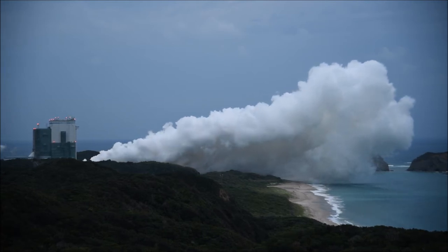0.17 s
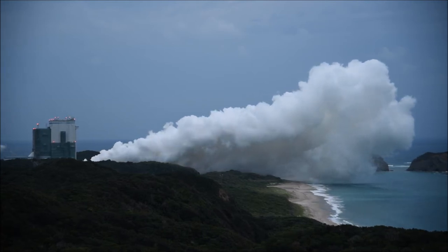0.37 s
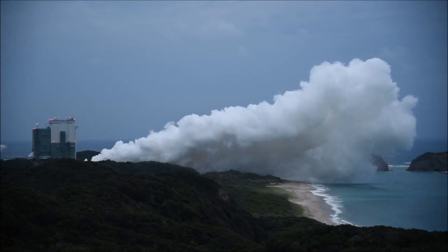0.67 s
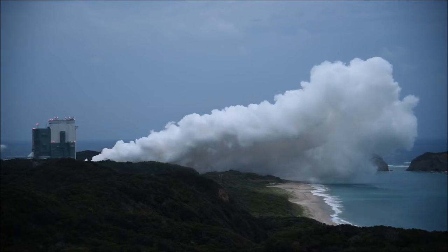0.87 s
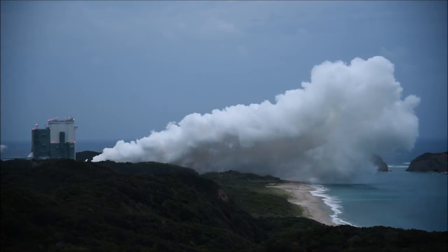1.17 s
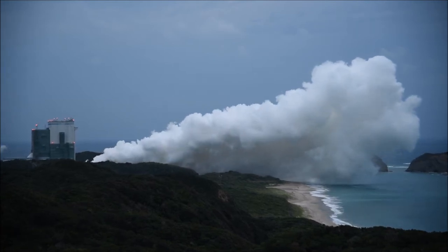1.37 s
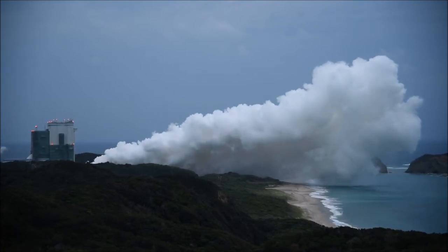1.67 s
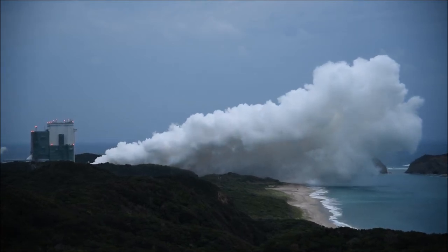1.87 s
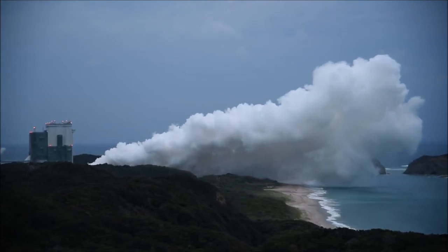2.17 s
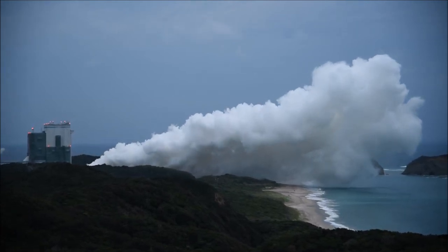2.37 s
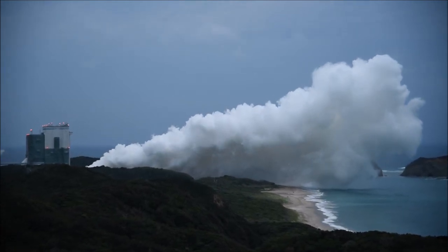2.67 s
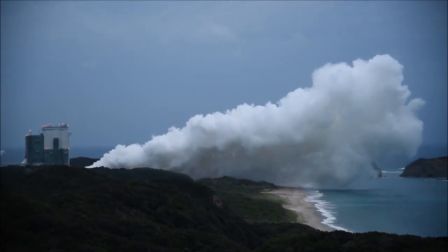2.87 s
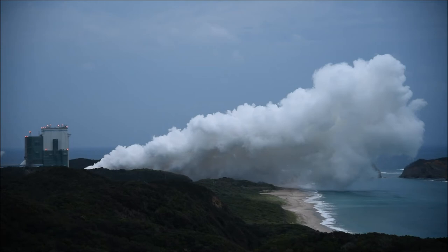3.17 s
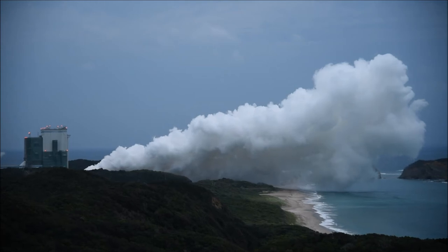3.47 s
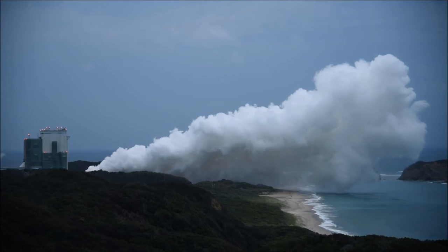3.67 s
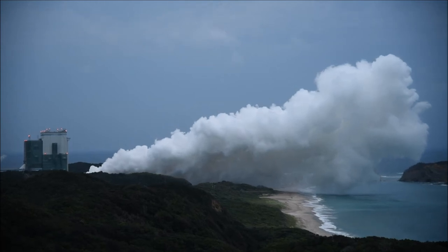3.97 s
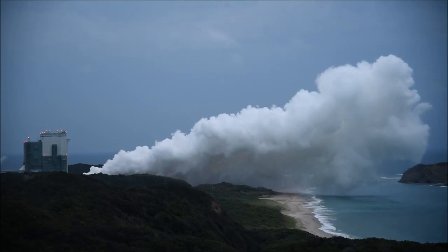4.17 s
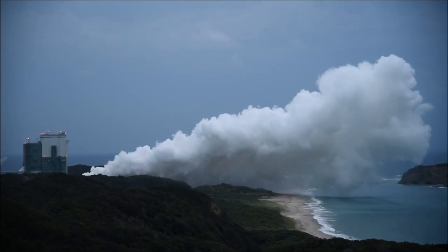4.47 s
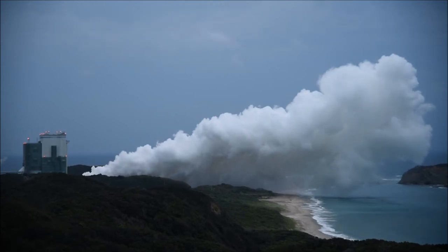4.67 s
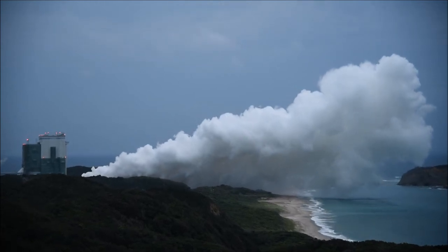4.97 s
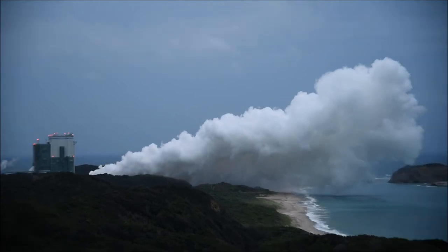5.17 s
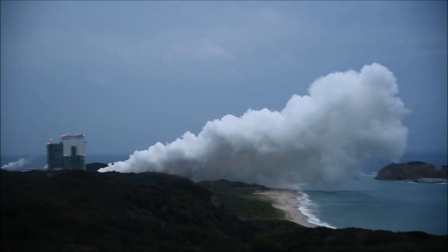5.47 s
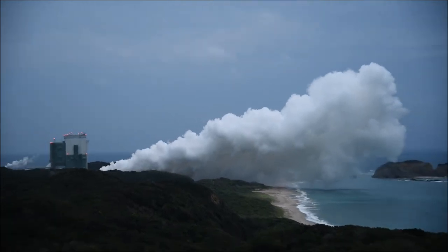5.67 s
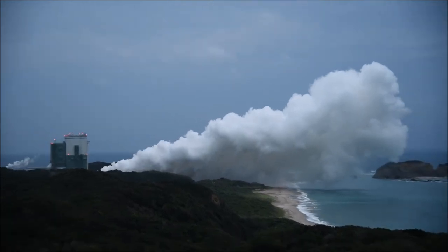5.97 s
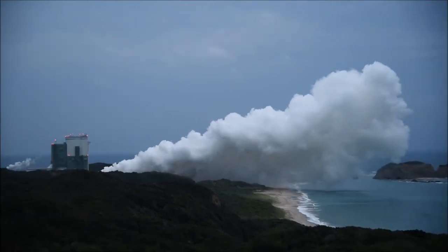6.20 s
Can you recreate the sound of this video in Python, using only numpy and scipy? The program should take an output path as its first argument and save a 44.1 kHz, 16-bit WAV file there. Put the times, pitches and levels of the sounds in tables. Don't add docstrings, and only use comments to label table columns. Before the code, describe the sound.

From 0 s a large rocket engine is already firing on a far stand across a bay, and its roar runs unbroken to the end at about 6.3 s. A deep throb and lumpy rumble lie under a wide, rough rushing roar, with blunted crackles scattered throughout, stronger around 1.3 to 1.8 s. Distance removes most treble; moving air and ground echo make the tone waver, with less deep throb around 3 to 4 s and a fuller, hollower low end after 5 s. Close to the stereo microphone, very faintly, a high insect buzzes on the right and another flutters at a slower rate on the left, both swelling after 4.5 s. Leaves rustle softly, with puffs from 1.4 s, strongest near 5.2 s. Tiny dry twig ticks fall between 1.4 and 5.2 s. A very high, thin camera whine rises briefly near 4.9 s and again from 5.8 s.

```python
import sys
import numpy as np
from scipy import signal
from scipy.fft import rfft, irfft, next_fast_len
from scipy.io import wavfile
from scipy.ndimage import uniform_filter1d, minimum_filter1d, map_coordinates

SR = 44100
rng = np.random.default_rng(int(sys.argv[2]) if len(sys.argv) > 2 else 0)


def invert_db(level):
    return 10 ** (np.asarray(level, dtype=float) / 20)


def log_audio(samples):
    frames = np.atleast_2d(samples).T
    limited = np.clip(frames, -1, 1)
    pcm = np.round(limited * 32767).astype(np.int16)
    wavfile.write(sys.argv[1], SR, pcm)


N = 279594
SIDES = np.array([[1], [-1]])


def seconds():
    return np.arange(N) / SR


def unit(x):
    return x / np.sqrt(np.mean(x ** 2) + 1e-20)


def along(points, hz):
    f, *cols = np.transpose(points)
    return np.array([np.interp(np.log(hz + 1), np.log(f + 1), c) for c in cols])


def curves(rows):
    s, *cols = np.transpose(rows)
    return [np.interp(seconds(), s, c) for c in cols]


def wobble(rate_hz):
    return map_coordinates(rng.standard_normal(4000), [np.arange(N) * rate_hz / SR])


def filtered(x, response):
    m = next_fast_len(N + 8192)
    return irfft(rfft(x, m) * response(np.fft.rfftfreq(m, 1 / SR)), m)[..., :N]


def delay(hz, s):
    return np.exp(-2j * np.pi * hz * s)


def rush(spectrum, patchy_db):
    z = signal.stft(rng.standard_normal((2, N + 512)), nperseg=512)[2]
    field = uniform_filter1d(rng.standard_normal(z.shape[1:]), size=6, axis=0)
    field = uniform_filter1d(field, size=12, axis=1)
    pair = signal.istft(z * invert_db(patchy_db * unit(field)), nperseg=512)[1][:, :N]
    return unit(filtered(pair, lambda hz: invert_db(along(spectrum, hz))))


# t/s, downward bending/dB, eddy surge/dB, ground echo/0-1, air clearness/dB
AIR_PATH = [(0, -2.5, -3, 0.2, -0.5), (.45, 1.5, -4, 0.09, 0.5), (.95, 2, 1, .2, 0.5), (1.25, 3, 2, .25, 1),
            (1.6, 2, 0.5, 0.2, 0), (2.2, 2, 1, 0.23, -.5), (2.75, -3, -1, 0.31, 0.5),
            (3.25, -5.5, -1.5, 0.21, 0), (3.6, -4, -1, .22, 2), (3.9, -2.5, 0, .28, 0),
            (4.3, -1.5, 2.5, .15, 0), (4.75, 0, 1, .05, 0), (5.1, 3, 2.5, .05, 0.5),
            (5.5, 2.5, 2, .15, -0.5), (5.9, 3, -1.5, .2, 0), (6.34, 3.5, -0.5, .05, -0.5)]


def jet():
    bend_db, surge_db, echo, clear_db = curves(AIR_PATH)
    shocks = wobble(45) + 1.4 * wobble(130)
    low = throb(bend_db) + eddies(surge_db) + plume_body(bend_db, shocks)
    high = roar(clear_db, shocks)
    echo = np.clip(1.35 * echo, 0, 1)
    combed = (high + echo * ground_bounce(high, echo)) / np.sqrt(1 + echo ** 2)
    return ports(low + fronts() + combed)


# f/Hz, level/dB per Hz
THROB_SPECTRUM = [(12, -130), (15, -39.5), (24, -0.5), (32, 3), (41, 17), (50, 16), (58, 12.5), (66, -5),
                  (80, -40), (120, -130)]


def throb(bend_db):
    return invert_db(-26 + 0.93 * bend_db) * rush(THROB_SPECTRUM, patchy_db=0.7)


# f/Hz, level/dB per Hz
EDDY_SPECTRUM = [(30, -130), (48, -41), (60, -8), (78, 0), (92, -1), (108, 3), (122, -1), (140, -7),
                 (170, -42), (300, -130)]


def eddies(surge_db):
    return invert_db(-19 + surge_db + 0.55 * wobble(8)) * drifting(rush(EDDY_SPECTRUM, patchy_db=-0.23))


# t/s, f/Hz
EDDY_PITCH_DRIFT = [(0, 105.8), (.5, 98.13), (.85, 108.2), (1.2, 92), (1.6, 110), (2.1, 97.9), (2.5, 105.8),
                    (2.8, 99.8), (3.1, 116.2), (3.5, 96.1), (3.95, 100), (4.3, 106), (4.65, 119.8),
                    (5.05, 107.9), (5.5, 114.1), (5.9, 104), (6.34, 98)]


def drifting(pair):
    pitch_hz, = curves(EDDY_PITCH_DRIFT)
    place = np.cumsum((pitch_hz / pitch_hz.mean()) ** 0.9)
    return np.array([np.interp(place * N / place[-1], np.arange(N), c) for c in pair])


# f/Hz, level/dB per Hz
BODY_SPECTRUM = [(70, -130), (110, -40.5), (135, -4), (156, -0.5), (215, -1.5), (330, -2.5), (370, -7.5),
                 (440, -42), (700, -130)]
# t/s, strength/-1..1
BODY_HOLLOW = [(0, -.2), (.7, -.1), (1.4, .1), (2.1, 0.052), (2.8, -0.05), (3.6, -.1), (4.3, -0.12),
               (4.8, 0.22), (5.2, .6), (5.8, .5), (6.34, .3)]


def plume_body(bend_db, shocks):
    body = invert_db(0.33 * shocks) * rush(BODY_SPECTRUM, patchy_db=1.05)
    strength = np.clip(curves(BODY_HOLLOW)[0], -1, 1)
    body = body + strength * filtered(body, lambda hz: delay(hz, 0.0024))
    return invert_db(-22 - 0.36 * bend_db) * body


# f/Hz, level/dB per Hz
SHEAR_SPECTRUM = [(200, -130), (290, -31), (350, -3.5), (460, 0.5), (510, -4), (610, 0), (660, -4),
                  (900, -2.5), (1250, -3.5), (1650, -6), (1900, -17), (2300, -50.5), (3500, -130)]
# f/Hz, level/dB per Hz
FINE_SPECTRUM = [(900, -130), (1400, -40.5), (1650, -6), (1850, -2.5), (2200, -2.5), (2980, -11.5),
                 (3260, -12.5), (3820, -19), (4630, -29), (5500, -40), (6800, -56), (8000, -68),
                 (11000, -130)]


def roar(clear_db, shocks):
    late_s = seconds() - 3
    shear = invert_db(0.45 * shocks) * rush(SHEAR_SPECTRUM, patchy_db=0.51)
    top_db = 0.44 * clear_db - 0.28 * late_s
    top = filtered(shear, lambda hz: 1 / (1 + (1000 / (hz + 1)) ** 6))
    shear = shear + (invert_db(top_db) - 1) * top
    fine_db = -8 + clear_db - 0.22 * late_s + 0.54 * shocks + 0.44 * wobble(7)
    return invert_db(-16) * (shear + invert_db(fine_db) * rush(FINE_SPECTRUM, patchy_db=0.53))


def ground_bounce(high, echo):
    late = filtered(high, lambda hz: delay(hz, 0.00262) / (1 + (hz / 1950) ** 4))
    phase_rad = 0.75 - 1.3 * echo
    return np.real(signal.hilbert(late, next_fast_len(N))[:, :N] * np.exp(1j * phase_rad))


# t/s, peak level/dB
FRONT_EVENTS = [(0.0712, -38), (0.2015, -42), (0.6285, -41.5), (1.0096, -39.5), (1.2994, -38), (1.405, -36),
                (1.502, -38.5), (1.813, -35.5), (2.6948, -44.5), (3.0135, -40.5), (3.1077, -39),
                (3.2284, -45), (3.6916, -40.5), (3.8108, -42), (3.9686, -43), (4.0225, -37.5),
                (4.5351, -45), (5.2529, -43)]
# f/Hz, level/dB per Hz
FRONT_SPECTRUM = [(300, -130), (1000, -9), (2000, -2), (3500, -10.5), (5000, -23), (6500, -38.5),
                  (8000, -65), (11000, -130)]


def fronts():
    strays_per_s, smear_s = 21, 0.0015
    s, db = np.transpose(FRONT_EVENTS)
    when, size = rng.random((400, 2))[:int(strays_per_s * N / SR)].T
    steps = np.zeros(N)
    steps[(when * N).astype(int)] = invert_db(-50.5 + 6.2 * size)
    steps[(s * SR).astype(int)] = invert_db(db)
    smear = rng.standard_normal(400) * np.exp(-np.arange(400) / SR / smear_s)
    steps = invert_db(-1.5) * np.convolve(steps, smear / np.linalg.norm(smear))[:N]

    def shape(hz):
        return -1j * invert_db(along(FRONT_SPECTRUM, hz)[0])

    peak = abs(filtered(np.arange(N) == N // 2, shape)).max()
    return invert_db(25.5) * filtered(steps, shape) / peak * [[1], [0]]


# f/Hz, likeness/0-1, left-right level/dB, left lead/rad
PORT_RESPONSE = [(260, 1, 0, 0), (460, 1, 0, 0.01), (740, 0.98, 0, 0), (950, 0.96, 1.5, 0),
                 (1350, 0.97, -1.2, 0.38), (1730, 0.92, -3, 0.57), (2240, 0.77, -2.3, 1), (3270, 1, 3, 1),
                 (3700, .87, 2, .5), (4300, .82, 0, 0.58), (4960, 0.5, -1.5, 1.1), (6500, 0.5, -4, 0.0069)]


def ports(pair):
    m = next_fast_len(N + 8192)
    alike, balance_db, lead_rad = along(PORT_RESPONSE, np.fft.rfftfreq(m, 1 / SR))
    turn = np.arccos(np.clip(alike, 0, 1)) / 2
    direct, scattered = rfft(pair, m)
    both = np.cos(turn) * direct + SIDES * np.sin(turn) * scattered
    shading = invert_db(SIDES * balance_db / 2) * np.exp(0.5j * SIDES * lead_rad)
    return irfft(shading * both, m)[:, :N]


def scrub():
    return buzzer() + triller() + breeze() + twigs()


# t/s, level/dB, strokes gained on the beat/count
BUZZER_SONG = [
    (0, -69, .12),
    (.9, -71.5, 1.03),
    (1.5, -69.5, 1.21),
    (2.25, -70.5, 1.25),
    (3.05, -73, .65),
    (4.05, -70, .65),
    (4.65, -66.5, .48),
    (5.25, -65.5, .33),
    (6.24, -67, -.6),
]


def buzzer():
    tone = insect(BUZZER_SONG, beat_hz=110, start_hz=9380, fall_hz=1250, duty=0.8, scatter_db=1.5,
                  blur_hz=35, fade_db=2.0, dwell=1.05)
    return placed(tone, mid_db=5.5, balance_db=-11.0, lead_rad=2.8, wet_db=-11)


# t/s, level/dB, strokes gained on the beat/count
TRILLER_SONG = [
    (0, -64.5, .33),
    (.6, -63.5, .48),
    (1.5, -63, .52),
    (2.3, -65.5, .6),
    (3.3, -67.5, .53),
    (4.5, -60.5, .66),
    (5, -61.5, .73),
    (5.4, -64, 0.73),
    (6.34, -58.5, .78),
]


def triller():
    tone = insect(TRILLER_SONG, beat_hz=32, start_hz=7700, fall_hz=680, duty=0.8, scatter_db=1.5,
                  blur_hz=34.8, fade_db=14.5, dwell=2.0)
    return placed(tone, mid_db=-3.0, balance_db=7, lead_rad=1.9, wet_db=-3)


def insect(song, beat_hz, start_hz, fall_hz, duty, scatter_db, blur_hz, fade_db, dwell):
    t = seconds()
    level_db, drift = curves(song)
    turns = beat_hz * t + drift + duty / 2 - fade_db / 75
    stroke = np.clip((turns % 1) / duty, 0, 1)
    size_db, detune = rng.standard_normal((1000, 2))[turns.astype(int)].T
    pitch_hz = start_hz - fall_hz * stroke ** dwell + blur_hz * (detune + wobble(600))
    envelope = np.sin(np.pi * stroke) * invert_db(scatter_db * size_db - fade_db * stroke)
    tone = np.exp(2j * np.pi * np.cumsum(pitch_hz) / SR) * envelope
    sings = t < song[-1][0] + 0.012
    return tone / np.sqrt(np.mean(abs(tone) ** 2) / 2) * invert_db(level_db) * sings


def placed(tone, mid_db, balance_db, lead_rad, wet_db):
    dry = np.real(tone * invert_db(SIDES * balance_db / 2) * np.exp(0.5j * SIDES * lead_rad))
    tail = rng.standard_normal((2, 4000)) * invert_db(-60 * np.arange(4000) / SR / 0.07)
    wet = signal.fftconvolve(np.real(tone)[None], tail / np.linalg.norm(tail[0]), axes=1)[:, :N]
    return invert_db(mid_db) * (dry + invert_db(wet_db) * wet)


# f/Hz, level/dB per Hz
RUSTLE_SPECTRUM = [(5000, -120), (6500, 7.5), (8000, 5.5), (9400, 5), (9900, -5.5), (11000, 3.5),
                   (12000, -2.5), (14400, -3.5), (14700, -16.5), (16500, -30.5)]
# f/Hz, level/dB per Hz
FLICK_SPECTRUM = [(5000, -120), (7000, 0), (9500, 1.5), (11000, -1.5), (12500, -13), (14500, -19.5),
                  (16500, -40)]
# t/s, peak level/dB
PUFF_EVENTS = [(.28, -81), (1.36, -74), (2.05, -77), (2.34, -78), (3.39, -76), (3.64, -77), (3.88, -78.5),
               (4.11, -78), (4.36, -77), (4.66, -75), (4.85, -77), (5.01, -72), (5.19, -65), (5.5, -72),
               (5.83, -68), (6.0, -77), (6.2, -74)]


def breeze():
    rise_s, fall_s = 0.044, 0.025
    lull_s, lull_width_s, lull_db = 6.9, 0.22, -10
    t, coarse = seconds(), np.arange(0, N, 44) / SR
    puffs = np.zeros(len(coarse))
    for s, db in PUFF_EVENTS:
        puffs += invert_db(db) * np.exp(-np.where(coarse < s, (s - coarse) / rise_s, (coarse - s) / fall_s))
    calm_db = -76.5 + lull_db * np.exp(-((t - lull_s) / lull_width_s) ** 2) + 1.5 * wobble(12)
    calm = invert_db(calm_db) * rush(RUSTLE_SPECTRUM, patchy_db=2.2)
    flicks = np.interp(t, coarse, puffs) * invert_db(2.5 * wobble(90)) * rush(FLICK_SPECTRUM, patchy_db=2.0)
    mid, side = calm + flicks
    return mid + 0.45 * side * SIDES


# t/s, peak level/dB
TWIG_EVENTS = [(1.4087, -64.5), (1.714, -69), (2.0123, -71.5), (2.1056, -68), (2.2942, -68.5),
               (2.8892, -70.5), (2.9277, -70.5), (3.014, -66), (3.1078, -64), (3.2455, -68), (3.2725, -67),
               (3.4281, -61), (3.47, -61.5), (3.6247, -59), (3.7828, -68), (4.0243, -66.5), (4.2911, -70),
               (4.6384, -69.5), (4.8105, -61.5), (4.9212, -63.5), (4.9995, -60.5), (5.031, -68.5),
               (5.1542, -59.5)]
# f/Hz, level/dB per Hz
TWIG_SPECTRUM = [(4000, -120), (6000, -6), (10000, 0.5), (15500, -3.5), (18000, -30)]


def twigs():
    fade_s = 0.0015
    s, db = np.transpose(TWIG_EVENTS)
    starts = np.bincount((s * SR).astype(int), invert_db(db - 2), N)
    bursts = np.convolve(starts, np.exp(-np.arange(600) / SR / fade_s))[:N]
    mid, side = bursts * rush(TWIG_SPECTRUM, patchy_db=-1.0)
    return mid + 0.5 * side * SIDES


# t/s, level/dB
MOTOR_STRAIN = [
    (0, -84.5),
    (1.6, -82.5),
    (3.2, -84),
    (4.6, -80),
    (4.87, -73),
    (5.0, -84),
    (5.45, -83),
    (5.85, -74),
    (6.34, -70),
]


def camera_whine():
    t = seconds()
    scan = np.exp(2j * np.pi * 15716 * t + 0.45j * SIDES)
    level_db = curves(MOTOR_STRAIN)[0] + 10.0 + 2.5 * wobble(14) + 1.1 * SIDES
    second = invert_db(-91 + 3 * wobble(6)) * np.sin(2 * np.pi * 10500 * t)
    return invert_db(level_db) * np.real(scan) + second


def scene():
    return jet() + scrub()


def top_cut(x):
    return signal.sosfilt(signal.butter(12, 15830, fs=SR, output="sos"), x)


def record(dry):
    level = np.sqrt(abs(uniform_filter1d(np.mean(dry ** 2, axis=0), size=2600)) + 1e-9)
    x = dry * (level / invert_db(-12.5)) ** -0.3
    swing = uniform_filter1d(uniform_filter1d(x.mean(axis=0), size=14), size=10)
    x = x - 0.035 * (swing ** 2 - np.mean(x ** 2))
    room_left = np.minimum(1, 0.9 / (abs(x).max(axis=0) + 1e-9))
    gain = minimum_filter1d(room_left, size=601)
    x = x * uniform_filter1d(uniform_filter1d(gain, size=300), size=300)
    return top_cut(x + camera_whine())


dry = scene()
out = record(dry)
log_audio(out)
```